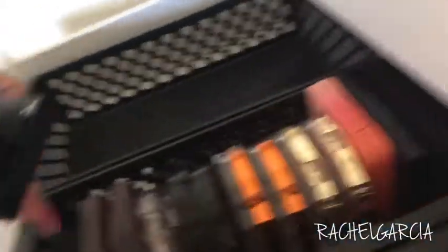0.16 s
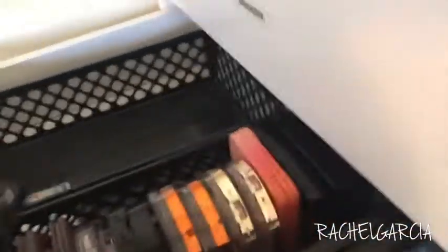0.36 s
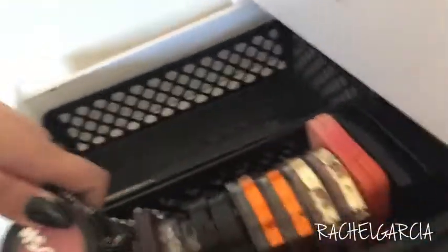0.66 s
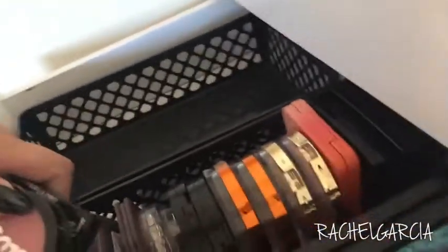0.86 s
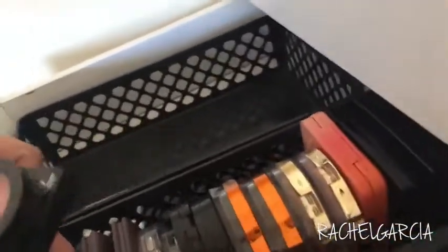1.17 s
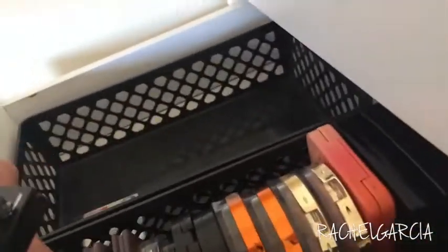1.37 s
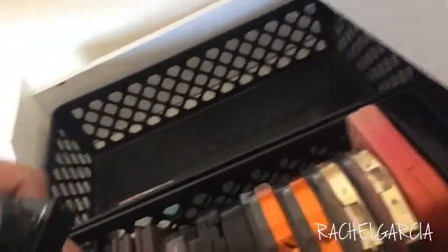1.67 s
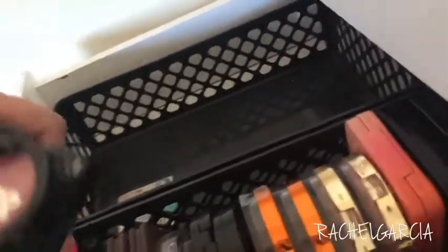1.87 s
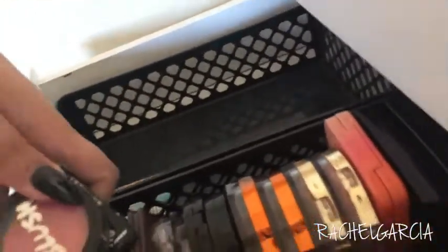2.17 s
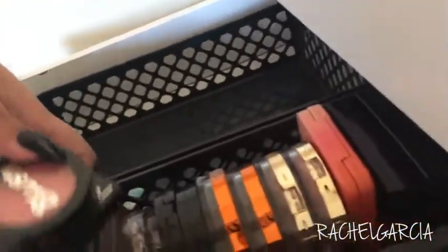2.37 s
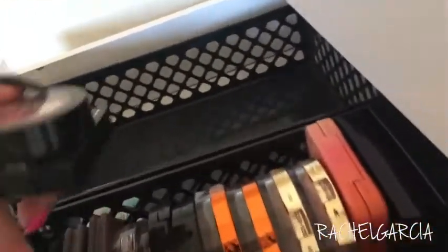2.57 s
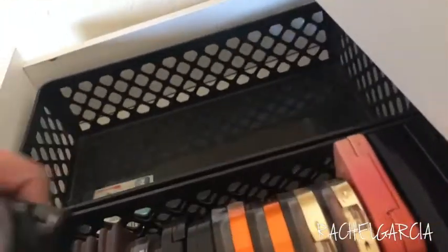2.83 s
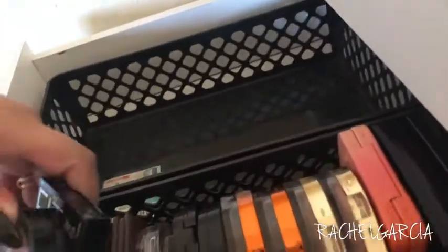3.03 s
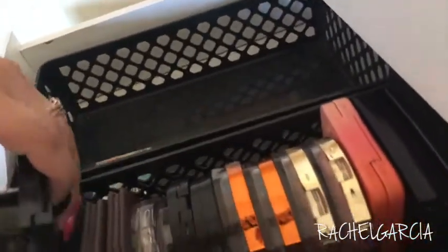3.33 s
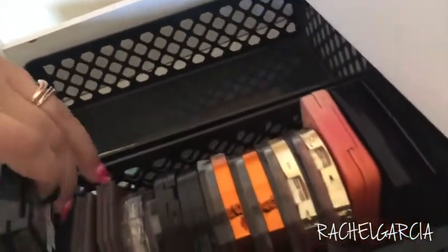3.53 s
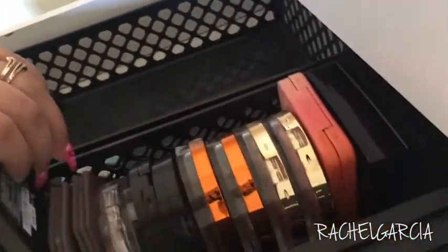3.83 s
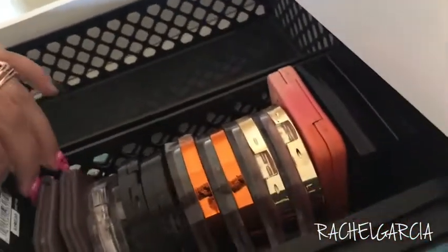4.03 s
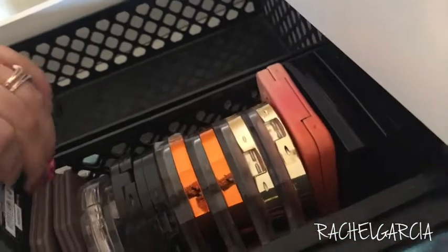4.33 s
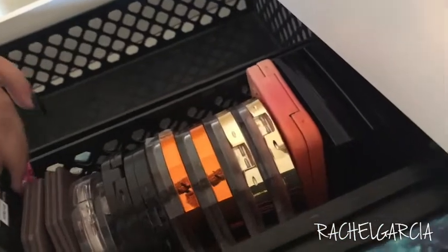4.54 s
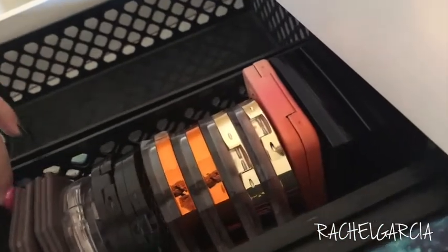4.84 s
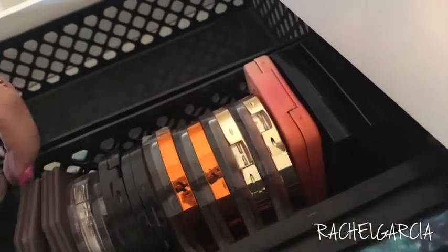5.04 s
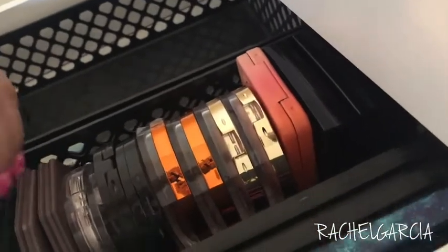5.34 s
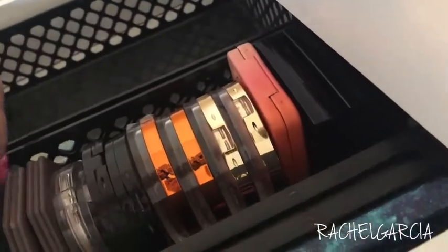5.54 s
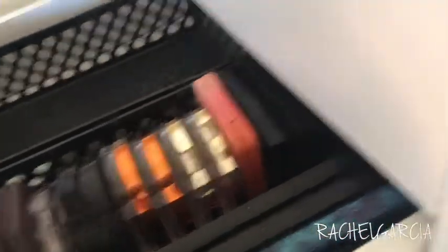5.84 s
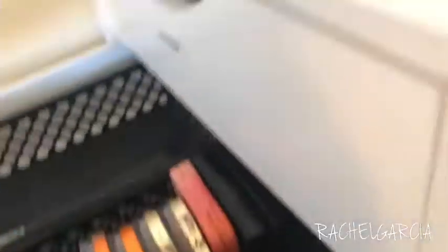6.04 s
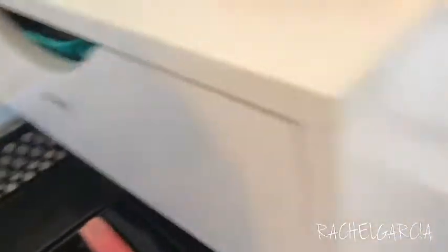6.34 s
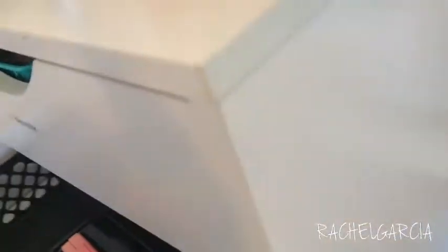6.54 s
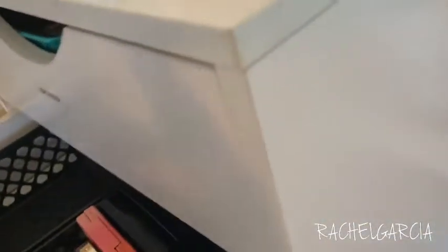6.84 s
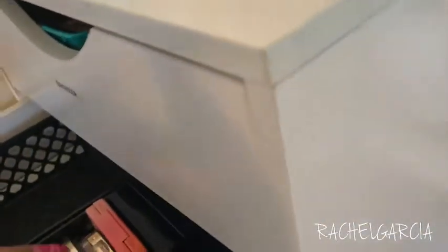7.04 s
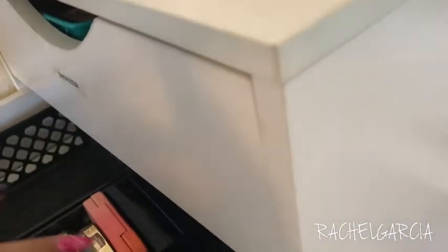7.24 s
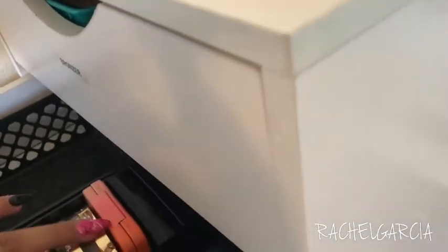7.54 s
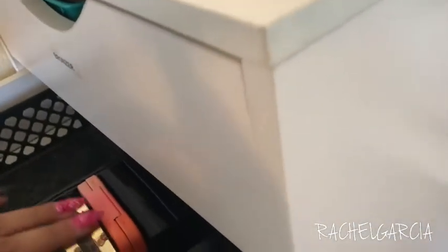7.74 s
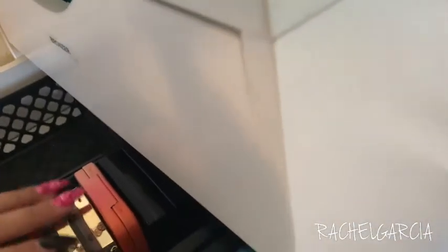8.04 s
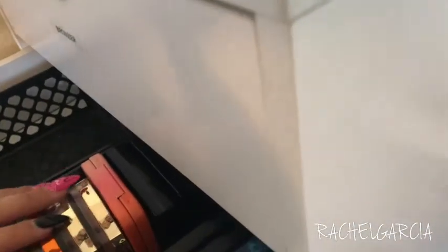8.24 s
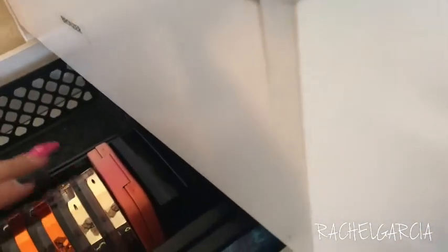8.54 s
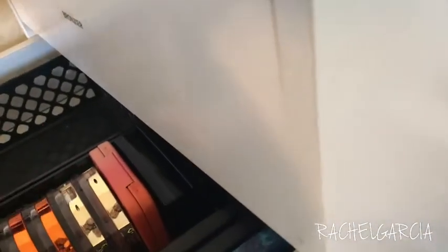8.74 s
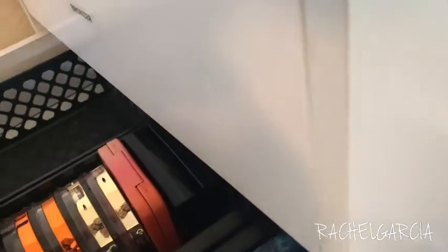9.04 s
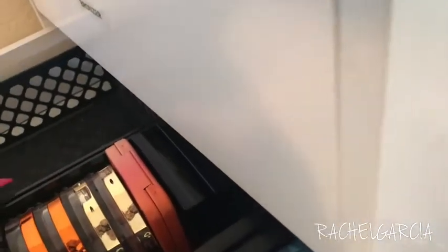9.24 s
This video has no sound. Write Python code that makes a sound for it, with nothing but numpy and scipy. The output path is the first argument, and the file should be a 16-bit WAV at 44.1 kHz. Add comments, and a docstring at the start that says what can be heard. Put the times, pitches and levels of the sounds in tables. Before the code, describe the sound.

Hard plastic compacts click and clatter against each other in a mesh basket inside a drawer, busiest midway, then thinning to sparse taps.

```python
"""In a drawer, close to a phone, hands shift plastic compacts in a plastic mesh basket.
The cases click: a few milliseconds of tiny touches ring their shells, edges and rims.
Some knocks thump the basket floor and the drawer as dying low tones; two faint squeaks are sine tones.
Sliding along the mesh is noise shaped by many small slips, with a low rumble.
Behind it lie the faint hum of a quiet room and the rumble of the hand on the phone."""
import sys
import numpy as np
from scipy import signal
from scipy.fft import rfft, irfft
from scipy.io import wavfile
from scipy.ndimage import uniform_filter1d

SR = 44100
rng = np.random.default_rng(int(sys.argv[2]) if len(sys.argv) > 2 else 0)


def generate_wav(signal):
    """Clip the signal to [-1, 1] and save it as 16-bit WAV at the path in sys.argv[1]."""
    frames = np.transpose(np.atleast_2d(signal))
    scaled = np.clip(frames, -1, 1) * 32767
    pcm = np.round(scaled).astype(np.int16)
    wavfile.write(sys.argv[1], SR, pcm)


N = 414540  # length in samples

# Tones of the basket floor. Each row: pitch in Hz, relative level in dB, base time to die by 60 dB in seconds.
PANEL_TONES = [(286.6, 2.5, 0.06), (236.8, -8, 0.063), (411.9, -7.5, 0.074), (588.5, -4, 0.045),
               (724, -13, 0.051)]
# Tones of the heavier drawer. Each row: pitch in Hz, relative level in dB, base time to die by 60 dB in seconds.
DRAWER_TONES = [(80, -4, 0.16), (119.9, -4.5, 0.17), (151.1, 6.5, 0.087)]


def click(shell_db, edge_db, tick_db, shell_hz, edge_hz):
    """Two cases chatter for a few milliseconds; every touch rings shell, edge and rim."""
    # Damped tones of a case: shell, edge and rim.
    # Each row: pitch in Hz, relative level in dB, sharpness Q (later kept within limits).
    shell_modes = [(654, -15.5, 3.5), (790, -4, 3.3), (1050, -1, 2.3), (1530, -5, 2.4), (1760, -24.5, 1.5)]
    edge_modes = [(2404, -3, 3.3), (3220, -3, 2.8), (3680, -6.5, 3.6), (4402, -2.5, 4.6), (5520, -8, 3.8)]
    rim_modes = [(6365, 6.5, 3.2), (7870, -2.5, 9.3), (8300, 6, 2.8), (12200, 2, 8.9), (12200, -2.5, 1.3),
                 (15200, -10.5, 3.3)]
    t = np.arange(4096) / SR

    # Duller clicks, where the shell outweighs the edge, chatter longer.
    stretch_db = 0.07 * np.clip(shell_db - edge_db, -10, 20)
    chatter_s = 0.0014 * gain_of(stretch_db)
    u = t / chatter_s
    touches = rng.standard_normal(4096) * (0.32 + (rng.random(4096) < 0.2))
    lingering_rattle = 0.093 * np.exp(-u / 9)
    chatter = ((u + 0.35) * np.exp(-u) + lingering_rattle) * touches
    # One firm blow stands among the touches.
    chatter[np.searchsorted(u, 0.6)] = 0.59 * np.linalg.norm(chatter)

    # The face that takes the blow gets a tone of its own; the hollow case rings on faintly.
    shell = damped(chatter, shell_modes + [(shell_hz, 5.0, 5.0)])
    hollow_modes = [(k * shell_hz, 0, 0.084) for k in (0.93, 1, 1.12)]
    shell = shell + gain_of(-20.5) * rung(hollow_modes, t, spread_db=1)

    # The strongest high tone belongs to the edge below 6 kHz and to the rim above.
    strongest = (edge_hz, 3.0, 6.0)
    edge = damped(chatter, edge_modes + [strongest] * int(edge_hz < 6000))
    rim = damped(chatter, rim_modes + [strongest] * int(edge_hz >= 6000))
    return gain_of(shell_db) * shell + gain_of(edge_db) * edge + gain_of(tick_db) * rim


def hollow(x):
    """The hollow of drawer and room: sparse taps of random sign, each band dying at its own speed."""
    # How long the tail lasts. Each row: pitch in Hz, time to die by 60 dB in seconds.
    tail_times = [(300, 0.071), (1200, 0.062), (4000, 0.059), (12000, 0.034)]
    taps = np.zeros(SR // 2)
    at = np.arange(100, len(taps) - 20, 20)
    taps[at + rng.integers(0, 20, len(at))] = rng.choice([-1.0, 1.0], len(at))
    hz, t, bands = signal.stft(taps, SR, nperseg=128)
    f, t60 = np.transpose(tail_times)
    t60 = np.interp(np.log(hz + 1), np.log(f), t60)[:, None]
    tail = signal.istft(bands * gain_of(-60 * t / t60), SR, nperseg=128)[1]
    return signal.fftconvolve(x, tail / np.linalg.norm(tail))[:N]


def thump(db, boom_db):
    """A soft push rings the basket floor, and the heavier drawer booms with it."""
    t = np.arange(12000) / SR
    # Knocks that are stronger or have more boom ring longer.
    ring = np.clip(1.92 + 0.1 * boom_db + 0.06 * (db + 40), 0.2, 3)
    panel = rung([(hz, d, ring * t60) for hz, d, t60 in PANEL_TONES], t, spread_db=4.0)
    panel = panel * (1 - np.exp(-t / 0.012))  # soft start
    drawer = rung([(hz, d, ring * t60) for hz, d, t60 in DRAWER_TONES], t, spread_db=3)
    drawer = drawer * (1 - np.exp(-t / 0.0049))
    return gain_of(db) * (peaked(panel) + gain_of(boom_db) * peaked(drawer))


def sliding():
    """Small slips feed the rasp and the shells; slower lurches feed the low tones."""
    # Weight shifting in the drawer. Each row: time in seconds, strength of the rumble in dB.
    handling = [(0.0, -77), (0.83, -60.5), (1.26, -69), (1.49, -66), (1.65, -69), (3.48, -58.5),
                (4.03, -65.5), (4.42, -73), (4.66, -63.5), (4.87, -59.5), (5.23, -59.5), (5.71, -73),
                (6.62, -76.5), (6.96, -70), (8.32, -71), (8.46, -65), (8.82, -78.5), (9.4, -71)]
    # Colour of the mesh rasp. Each row: pitch in Hz, relative level in dB per Hz.
    rasp_colour = [(1500, -10.5), (2500, 4), (4500, 4.5), (7000, -0.5), (9000, -1), (10400, -6.5),
                   (12500, -0.5), (16000, -8.5)]
    # Colour of the dragging shells. Each row: pitch in Hz, relative level in dB per Hz.
    drag_colour = [(300, -8.5), (600, 3), (1200, 2.5), (1800, -5), (3000, -16.5), (5000, -33.5)]
    weight = gain_of(curve(handling))
    rasping, dragging, lurching = slide_gains()

    grain = slips(190, 0.0029, 0.62)
    rasp = coloured(grain * rng.standard_normal(N), rasp_colour)
    slower_grain = slips(90, 0.0087, 0.059)
    drag = coloured((grain + slower_grain) * rng.standard_normal(N), drag_colour)

    t = np.arange(12000) / SR
    body_modes = [(hz, db, 0.63 * t60) for hz, db, t60 in PANEL_TONES + DRAWER_TONES]
    body = rung(body_modes, t, spread_db=2.0)
    push = (weight + lurching) * evened(slips(30, 0.021, 0.44) * rng.standard_normal(N))
    rumble = signal.oaconvolve(push, body / np.linalg.norm(body))[:N]

    # Light rubbing goes on between the slides and follows the shifting weight.
    rasp_gain = rasping + gain_of(-18) * weight
    drag_gain = dragging + gain_of(-19.5) * weight
    return rasp_gain * rasp + drag_gain * drag + rumble


def slide_gains():
    """Gains of rasp, drag and lurch: every slide rises, holds and falls away."""
    # Cases sliding along the mesh.
    # Each row: start of the hold in seconds, its length in seconds, rasp level in dB, shell drag level in dB.
    slides = [(0.298, 0.062, -76, -65.5), (0.407, 0.0064, -76, -66), (.47, 0.0075, -77, -73),
              (0.664, .02, -79, -68), (0.962, 0.019, -58.5, -71.5), (1.265, 0.031, -77, -65),
              (1.405, 0.016, -52, -49.5), (1.504, 0.049, -63, -55.5), (1.637, 0.067, -79, -70.5),
              (1.851, 0.018, -79, -71.5), (1.962, 0.058, -101, -74), (2.143, 0.11, -90, -64),
              (2.25, 0.013, -68, -65), (2.45, 0.012, -56.5, -55.5), (2.532, 0.012, -56, -53),
              (2.665, .08, -59, -60.5), (2.966, 0.042, -64.5, -67), (3.038, 0.036, -75, -70.5),
              (3.17, 0.09, -69.5, -66), (3.396, 0.058, -93, -67.5), (3.537, .02, -58.5, -64),
              (3.622, 0.033, -66.5, -62), (3.76, 0.0079, -61, -76), (3.893, 0.04, -61, -55.5),
              (4.08, 0.062, -60, -53), (4.241, 0.046, -69, -57), (4.35, 0.1, -71, -63.5),
              (4.5, 0.038, -69, -62.5), (4.68, 0.073, -71, -62.5), (4.853, 0.2, -63.5, -56.5),
              (5.205, 0.1, -55.5, -50.5), (5.408, 0.038, -64.5, -63.5), (5.502, 0.074, -64.5, -73),
              (5.68, 0.032, -62.5, -62), (5.957, 0.0056, -73, -63), (6.242, 0.063, -69.5, -74.5),
              (6.622, 0.018, -68.5, -75), (6.798, 0.018, -70.5, -69), (6.865, 0.018, -70.5, -62),
              (7.027, 0.029, -70, -72.5), (7.155, 0.051, -63, -67), (7.259, 0.075, -71.5, -78),
              (7.46, 0.015, -63.5, -63), (7.674, 0.11, -73.5, -74), (8.069, 0.017, -78, -71),
              (8.312, 0.037, -81.5, -76), (8.493, 0.025, -78.5, -66), (9.125, 0.0092, -80, -62.5),
              (9.154, 0.027, -65.5, -60), (9.391, 0.024, -83, -61.5)]
    rise, fall = 330.5, 419  # dB per second
    t, gains = np.arange(N) / SR, np.zeros((3, N))
    for start, hold, rasp_db, drag_db in slides:
        near = slice(max(round((start - 0.2) * SR), 0), round((start + hold + 0.3) * SR))
        before = np.maximum(start - t[near], 0)
        after = np.maximum(t[near] - start - hold, 0)
        shape_db = -rise * before - fall * after
        lurch_db = drag_db - 4.5 + 0.44 * (drag_db - rasp_db)  # duller slides lurch more
        gains[:, near] += gain_of(shape_db + np.array([[rasp_db], [drag_db], [lurch_db]]))
    return gains


def slips(per_s, seconds, steady):
    """An envelope of uneven, dying slips, a few of them large, over a steady part."""
    size_db = 4.2 * np.minimum(rng.exponential(1, N), 4)
    size = gain_of(size_db) * (rng.random(N) < per_s / SR)
    return steady + evened(signal.lfilter([1], [1, -np.exp(-1 / (seconds * SR))], size))


def squeak(length, hz, db):
    """A short, slightly unsteady sine tone with soft ends."""
    t = np.arange(0, length, 1 / SR)
    wobble = 1 + 0.23 * uniform_filter1d(rng.standard_normal(4000), 150)[:len(t)]
    tone = np.sin(2 * np.pi * np.cumsum(hz * wobble) / SR)
    return gain_of(db) * tone * signal.windows.tukey(len(wobble), 0.4)


def background():
    """Room hum with microphone hiss, and the low rumble of the grip, all made of coloured noise."""
    # Colour of hum and hiss. Each row: pitch in Hz, relative level in dB per Hz.
    hum_colour = [(15, -22.5), (25, -1), (50, 3), (405, -5), (863, -15.5), (1890, -16), (2160, -16.5),
                  (2840, -18.5), (3080, -19.5), (9320, -25), (16000, -25.5)]
    # The hand on the phone rumbles. Each row: time in seconds, level in dB.
    grip_levels = [(0.0, -82), (0.86, -77.5), (5.23, -67), (5.55, -83), (7.8, -69.5), (8.85, -83),
                   (9.4, -71.5)]
    grip_colour = [(20, -36.0), (40, -12.0), (52, 2.5), (65, -6.5), (100, -37.5)]  # (Hz, dB)
    grip = coloured(rng.standard_normal(N), grip_colour)
    hum = gain_of(-73.5) * coloured(rng.standard_normal(N), hum_colour)
    return hum + gain_of(curve(grip_levels)) * grip


def damped(x, modes):
    """Touches x ring damped tones (Hz, dB, Q), each struck a little differently; rms 1 if packed in 7 ms."""
    hz = np.fft.rfftfreq(len(x), 1 / SR) + 1
    f, db, q = np.transpose(modes)[:, :, None]
    db = db + 2 * rng.standard_normal(db.shape)
    # Each part is reached at its own moment, up to 0.613 ms late.
    late = np.exp(-2j * np.pi * hz * 0.000613 * rng.random(db.shape))
    resonance = 1 / (1 + 1j * np.clip(q, 2, 6.5) * (hz / f - f / hz)) ** 2
    response = (gain_of(db) * late * resonance).sum(0)
    out = irfft(rfft(x) * response, len(x))
    return out / np.sqrt((out ** 2).sum() / (0.007 * SR))


def rung(modes, t, spread_db):
    """Sum of dying sine tones (Hz, dB, seconds to die by 60 dB), each struck a little differently."""
    hz, db, t60 = np.transpose(modes)[:, :, None]
    db = db + spread_db * rng.standard_normal(hz.shape)
    hz = hz * (1 + 0.02 * rng.standard_normal(hz.shape))
    return (gain_of(db - 60 * t / t60) * np.sin(2 * np.pi * hz * t)).sum(0)


def coloured(x, points):
    """Shapes x by a spectrum of (Hz, dB) points and scales it to rms 1."""
    f, db = np.transpose(points)
    hz = np.fft.rfftfreq(len(x), 1 / SR)
    gain = gain_of(np.interp(np.log(hz + 1), np.log(f + 1), db))
    return evened(irfft(rfft(x) * gain, len(x)))


def curve(table):
    """Draws straight lines between (seconds, value) points, one value for every sample."""
    s, values = np.transpose(table)
    return np.interp(np.arange(N) / SR, s, values)


def gain_of(db):
    """Turns decibels into a gain."""
    return 10 ** (np.asarray(db) / 20)


def evened(x):
    """Scales x to rms 1."""
    return x / np.sqrt(np.mean(x ** 2) + 1e-20)


def peaked(x):
    """Scales x to peak 1."""
    return x / abs(x).max()


def add(mix, s, sound):
    """Mixes a sound in at s seconds."""
    part = mix[round(s * SR):][:len(sound)]
    part += sound[:len(part)]


def scene():
    """Clicks with their tail, thumps, squeaks, sliding and the background."""
    # Cases meeting. Each row: time in seconds, shell ring under 2 kHz in dB, edge ring at 2-6 kHz in dB,
    # tick over 6 kHz in dB, shell pitch in Hz, edge pitch in Hz.
    meetings = [(.1455, -74, -67, -85, 2020, 2600), (.21, -73, -66, -89, 1960, 2410),
                (0.2283, -57.5, -62, -90, 1230, 2840), (.302, -48, -59, -91, 920, 2770),
                (0.324, -61, -67, -85, 1020, 3000), (.342, -50, -54, -80, 960, 4570),
                (.352, -51.5, -52.5, -78, 1060, 4300), (.412, -60, -70, -80, 790, 3000),
                (.467, -56, -64.5, -73, 778, 2060), (0.5476, -64.5, -56.5, -55.5, 1180, 9300),
                (0.6591, -50.5, -53.5, -55.5, 930, 5470), (.737, -60.5, -85, -89, 690, 2220),
                (.7806, -65, -58, -60, 1200, 2970), (.798, -57, -42, -38.5, 1070, 5370),
                (0.8207, -53, -48, -70, 704, 3080), (.829, -72, -57, -63, 1110, 3600),
                (.883, -41, -35.5, -68, 964, 2250), (0.9169, -49.5, -62, -57, 1870, 4420),
                (0.9409, -36, -28, -26, 1675, 9100), (1.186, -62, -65, -72, 656, 5050),
                (1.383, -52, -54, -64, 665, 3160), (1.398, -44, -46, -62, 750, 3820),
                (1.419, -38, -49.5, -64, 680, 2520), (1.4819, -32.5, -38.5, -39.5, 1340, 5000),
                (1.507, -32.5, -37.5, -43.5, 950, 2480), (1.5173, -30, -38, -46.5, 767, 2580),
                (1.539, -49, -54, -52, 1134, 5400), (1.645, -46, -63, -84, 940, 2220),
                (1.811, -34, -39.5, -41.5, 1260, 3730), (2.023, -67.5, -72, -86, 1490, 2650),
                (2.27, -53.5, -65.5, -76, 690, 2490), (2.327, -86, -71, -73, 1500, 6450),
                (2.423, -51.5, -67, -74, 730, 2100), (2.437, -47.5, -65, -76, 1130, 2170),
                (2.493, -55, -69, -74, 680, 2980), (2.517, -48, -54.5, -57, 740, 4690),
                (2.533, -45, -50, -55, 1690, 2340), (2.643, -35.5, -44, -45, 1090, 3840),
                (2.6619, -38.5, -48, -59, 1100, 3350), (2.6781, -38, -40, -60, 760, 4300),
                (2.702, -49, -56, -73, 1400, 4300), (2.737, -52, -63, -75, 1680, 5600),
                (2.865, -44.5, -37.5, -40, 1820, 4700), (2.9244, -54, -54.5, -61, 1060, 6000),
                (2.942, -29, -35.5, -48, 977, 2320), (2.963, -28, -30.5, -38.5, 1760, 2800),
                (3.095, -43.5, -49, -59.5, 1426, 4000), (3.149, -54, -65, -78, 1170, 2270),
                (3.167, -45, -58, -68, 996, 3100), (3.231, -78, -54.5, -50.5, 690, 3430),
                (3.3772, -33.5, -47, -58.5, 964, 2080), (3.4375, -55.5, -75, -86, 990, 2770),
                (3.536, -52, -47, -44, 1680, 7100), (3.5667, -45.5, -50, -53, 1900, 2240),
                (3.575, -49.5, -50.5, -44, 1850, 8300), (3.6157, -47, -48, -53, 2000, 4100),
                (3.6244, -38, -45, -52, 1325, 2250), (3.8036, -67, -51, -53, 1990, 2260),
                (3.835, -46.5, -56, -57, 800, 2400), (3.8744, -40.5, -51.5, -56, 830, 2930),
                (3.8852, -40.5, -48, -50, 717, 3950), (3.9152, -47.5, -46.5, -49, 786, 3850),
                (3.9388, -44, -44, -47, 756, 4060), (4.004, -47, -65, -63, 770, 2420),
                (4.023, -43, -44.5, -54, 1070, 2120), (4.0606, -36, -40.5, -57, 1190, 3520),
                (4.0921, -46.5, -61, -53, 1270, 3230), (4.137, -64, -53, -74, 1050, 3570),
                (4.2257, -45, -38, -40, 1020, 4450), (4.2353, -54, -47, -56, 920, 4620),
                (4.2524, -40, -40, -42.5, 1105, 4640), (4.267, -46, -57, -71, 1070, 2210),
                (4.3394, -47, -40, -50.5, 1790, 3860), (4.3531, -31.5, -39.5, -54, 1180, 4450),
                (4.392, -43, -52, -67, 930, 2500), (4.4768, -35.5, -48.5, -60, 1037, 3300),
                (4.574, -50, -58, -64, 930, 3170), (4.6234, -60, -60.5, -69, 1150, 5300),
                (4.6713, -24.5, -28.5, -34.5, 1293, 3530), (4.8076, -33, -35, -38, 930, 2290),
                (4.8687, -46, -46, -40, 2000, 8800), (4.921, -37, -40.5, -51, 1110, 3440),
                (4.9371, -32, -32, -38.5, 1255, 2880), (4.969, -43, -47, -54, 740, 2180),
                (4.979, -49, -55, -65, 970, 4600), (4.9905, -58, -47, -56, 770, 4670),
                (5.0023, -50, -47, -48, 1020, 5980), (5.021, -42, -52, -55, 744, 2250),
                (5.078, -52.5, -65, -74, 1100, 3640), (5.1998, -30, -34, -41.5, 1156, 3570),
                (5.237, -33, -34, -35.5, 1190, 6350), (5.248, -35, -38, -48, 1085, 2390),
                (5.2589, -32.5, -33, -41, 936, 2720), (5.2727, -42, -41, -65, 1220, 2210),
                (5.3149, -47, -48, -47.5, 745, 7900), (5.3254, -55, -39.5, -50, 830, 2350),
                (5.345, -41, -35.5, -39, 1810, 5560), (5.4012, -32.5, -26, -27, 1840, 2960),
                (5.453, -59, -41, -48.5, 1960, 2300), (5.484, -38.5, -29, -36, 1014, 2630),
                (5.5912, -67, -56, -58, 1540, 4200), (5.629, -55, -75, -73, 1000, 2340),
                (5.721, -64, -54, -60, 893, 2434), (5.95, -42, -62, -73.5, 1346, 2230),
                (5.9776, -61, -54, -65, 1950, 2350), (6.021, -68, -66, -88, 1010, 2890),
                (6.086, -73, -65.5, -75, 996, 3260), (6.218, -81, -57.5, -70, 1920, 4500),
                (6.2421, -72, -40.5, -44, 2030, 4560), (6.2983, -82, -50, -57, 2020, 5900),
                (6.3778, -75, -63, -59, 935, 6580), (6.59, -58, -43.5, -43, 1460, 5530),
                (6.7999, -44.5, -53, -61.5, 850, 2200), (6.8113, -61, -61.5, -58, 930, 7150),
                (6.8676, -57.5, -61, -65.5, 1290, 6000), (7.0425, -53, -57.5, -74, 1280, 2520),
                (7.145, -46, -59, -68, 954, 2300), (7.1767, -39, -41, -64, 645, 4400),
                (7.443, -61, -58.5, -65, 1000, 3900), (7.4743, -61, -41, -42.5, 990, 3900),
                (7.5593, -62, -64.5, -66, 995, 4440), (7.6362, -40, -47.5, -56.5, 745, 3700),
                (7.702, -78, -54.5, -69, 800, 3840), (7.808, -63, -77.5, -83.5, 893, 2200),
                (8.0684, -50, -64, -78, 1330, 2200), (8.473, -58, -69, -75, 676, 2100),
                (8.493, -54.5, -60.5, -78, 1476, 2060), (9.0908, -38.5, -61.5, -68, 1355, 2150),
                (9.097, -42.5, -62, -65.5, 1720, 2100), (9.1691, -35, -52.5, -59, 634, 2100),
                (9.3258, -60, -48.5, -44.5, 1990, 5230), (9.3843, -49, -62, -82, 710, 2340)]
    # Knocks passed on to basket and drawer.
    # Each row: time in seconds, level in dB, boom under 200 Hz in dB against that level.
    knocks = [(0.31, -46.5, -16), (.469, -48, -17), (0.946, -34.5, -6), (1.402, -31, -13.5),
              (1.487, -30, -6.5), (1.539, -31.5, -9), (1.645, -30, -12.5), (1.814, -37.5, -7.5),
              (2.269, -42.5, -9.5), (2.447, -42, -5.5), (2.646, -40.5, -7), (2.681, -37.5, 0),
              (2.945, -27.5, -10.5), (3.164, -50, -15), (3.38, -38.5, -20.5), (3.57, -53.5, 7.5),
              (3.633, -51.5, 7.5), (3.798, -48, -18), (3.846, -42.5, -5), (3.949, -39.5, -4),
              (4.032, -42, -12), (4.071, -48, -5), (4.396, -56, 8.5), (4.811, -37.5, -4.5),
              (4.947, -42.5, -4), (4.979, -46, -2), (5.015, -45, -1), (5.204, -40.5, 0.5),
              (5.241, -30, -6.5), (5.406, -43, -10), (5.488, -50, -6.5), (5.631, -44.5, -15),
              (5.951, -45.5, -27), (6.176, -44.5, -22), (6.432, -58, -8), (6.625, -44.5, -28),
              (6.662, -45, -29), (6.801, -47, -7.5), (7.042, -53.5, 3.5), (7.144, -52, -5),
              (7.179, -37.5, -3), (7.638, -38.5, -4), (8.068, -48.5, -6), (8.336, -60.5, 1.5),
              (8.477, -57.5, 3.5), (8.535, -56, 0), (9.171, -34, -7.5)]
    # Faint squeaks. Each row: time in seconds, length in seconds, pitch in Hz, level in dB.
    squeaks = [(6.74, 0.042, 3380, -74), (8.933, 0.047, 2860, -82)]
    clicks = np.zeros(N)
    others = sliding() + background()
    for s, *row in meetings:
        add(clicks, s, click(*row))
    for s, *row in knocks:
        add(others, s, thump(*row))
    for s, *row in squeaks:
        add(others, s, squeak(*row))
    return (clicks + gain_of(-20.5) * hollow(clicks) + others)[None]


def record(dry):
    """The microphone drops the deepest bass below 43 Hz; then the treble ends near 16.5 kHz."""
    dry = signal.sosfilt(signal.butter(4, 43, "high", fs=SR, output="sos"), dry)
    treble_limit = signal.firwin(255, 16500, window=("kaiser", 9), fs=SR)
    return signal.oaconvolve(dry, treble_limit[None], "same")


dry = scene()
out = record(dry)
generate_wav(out)
```